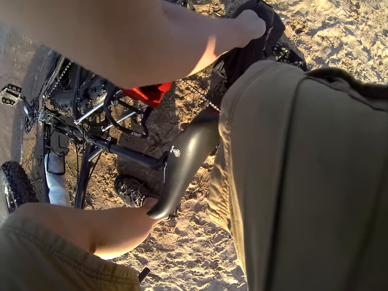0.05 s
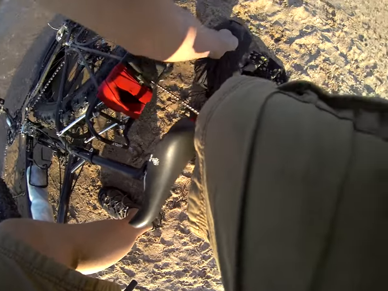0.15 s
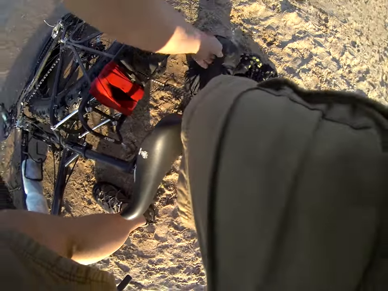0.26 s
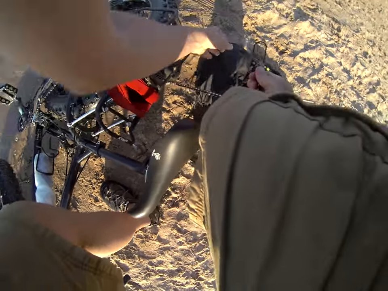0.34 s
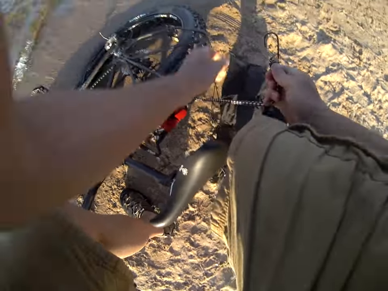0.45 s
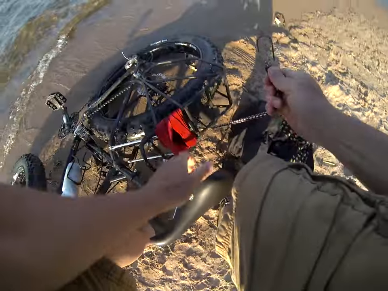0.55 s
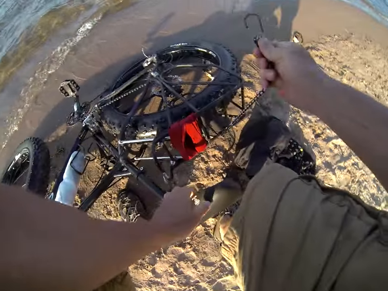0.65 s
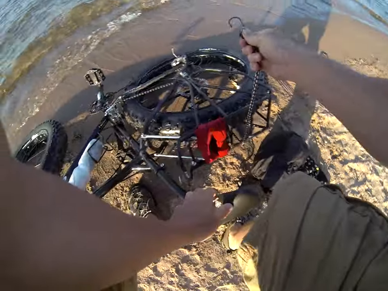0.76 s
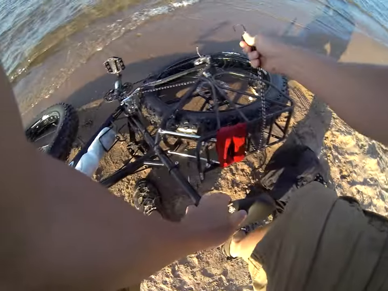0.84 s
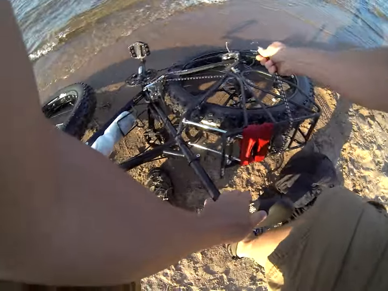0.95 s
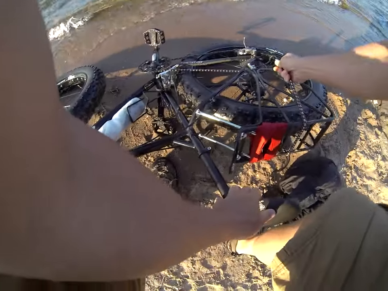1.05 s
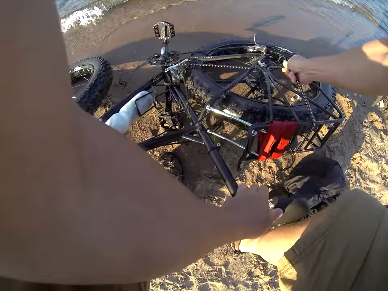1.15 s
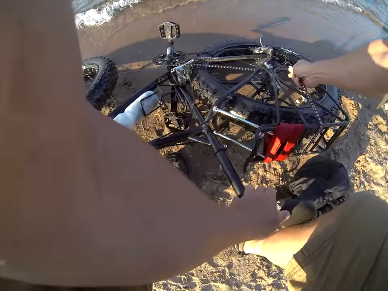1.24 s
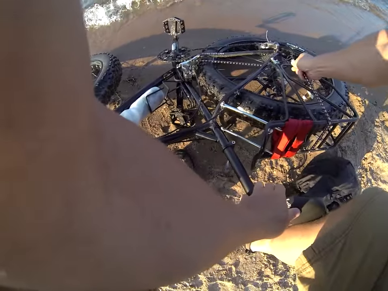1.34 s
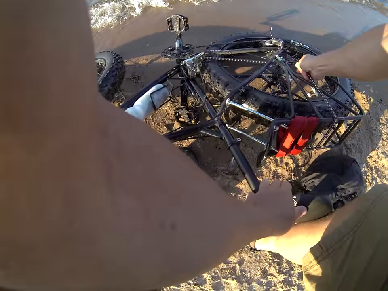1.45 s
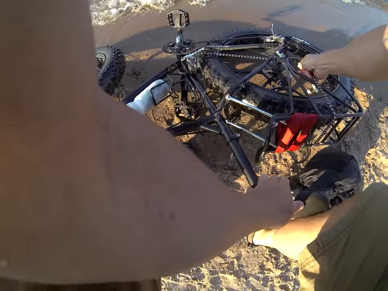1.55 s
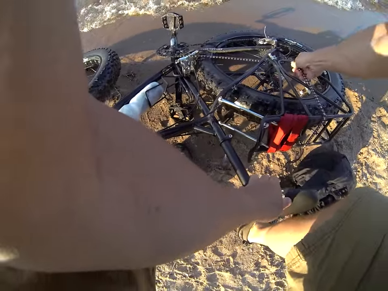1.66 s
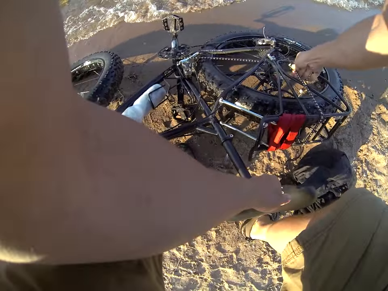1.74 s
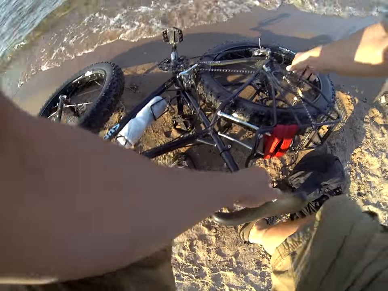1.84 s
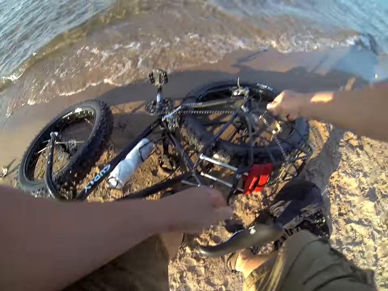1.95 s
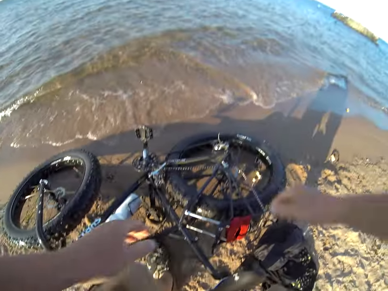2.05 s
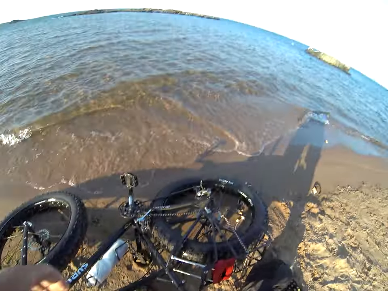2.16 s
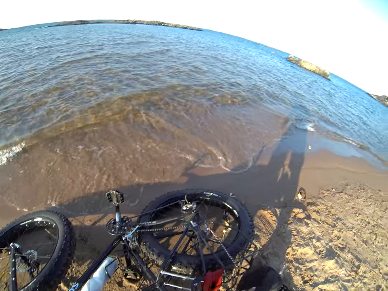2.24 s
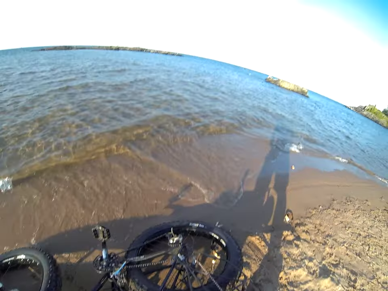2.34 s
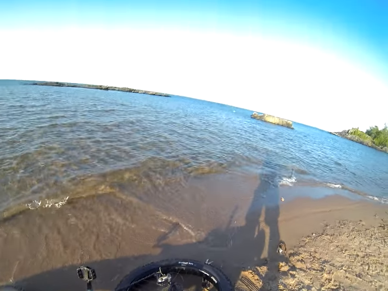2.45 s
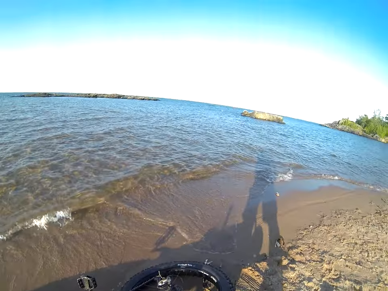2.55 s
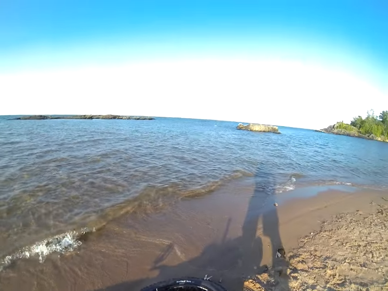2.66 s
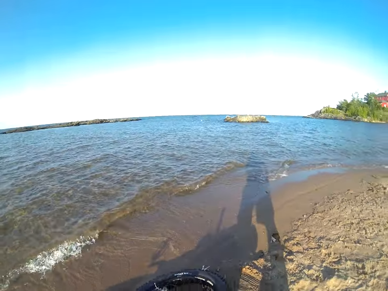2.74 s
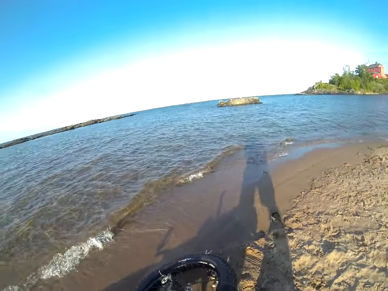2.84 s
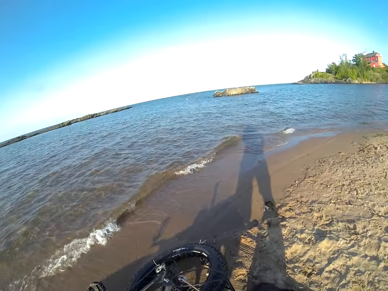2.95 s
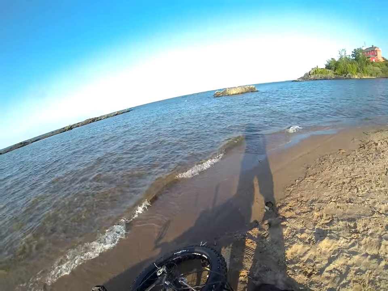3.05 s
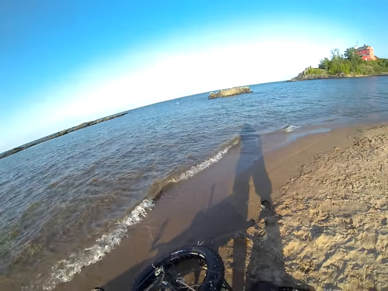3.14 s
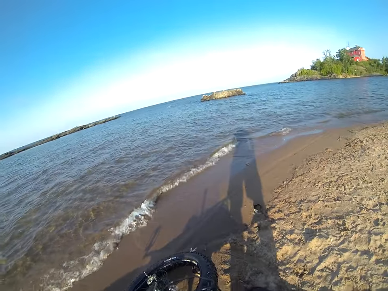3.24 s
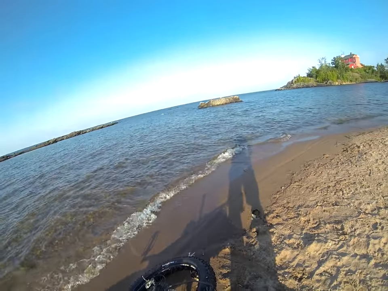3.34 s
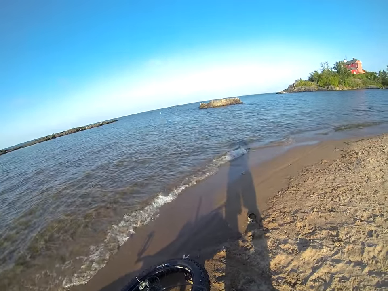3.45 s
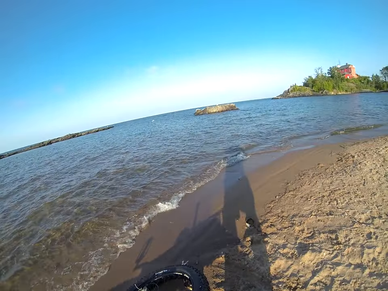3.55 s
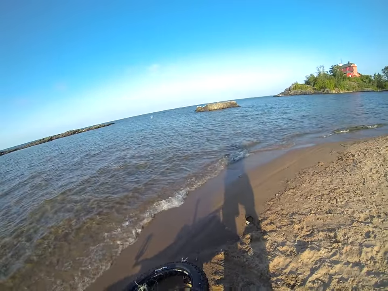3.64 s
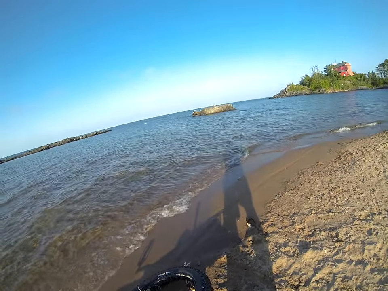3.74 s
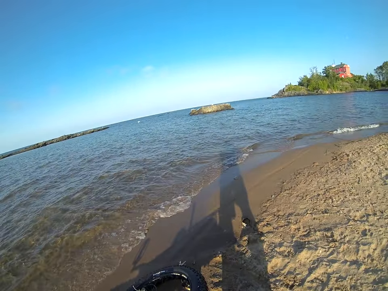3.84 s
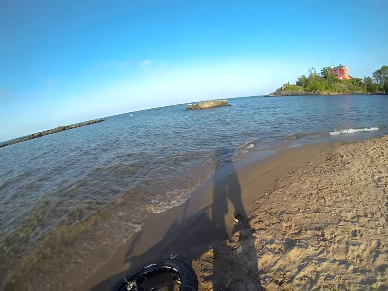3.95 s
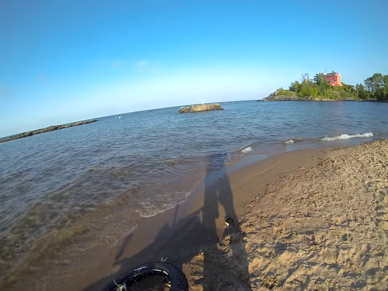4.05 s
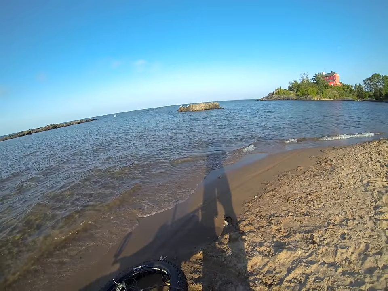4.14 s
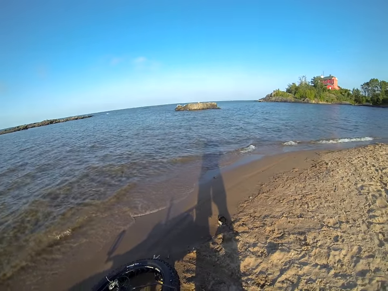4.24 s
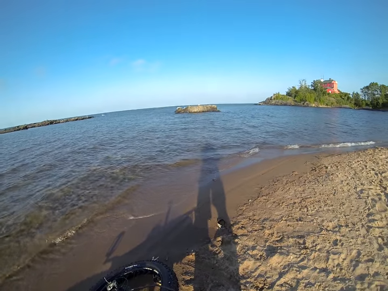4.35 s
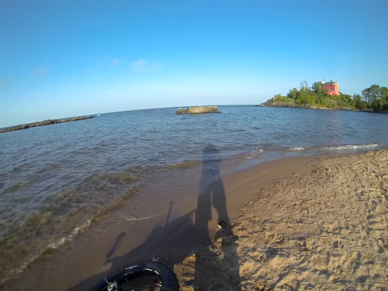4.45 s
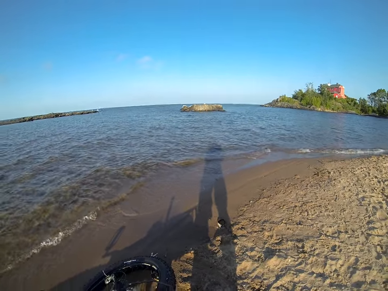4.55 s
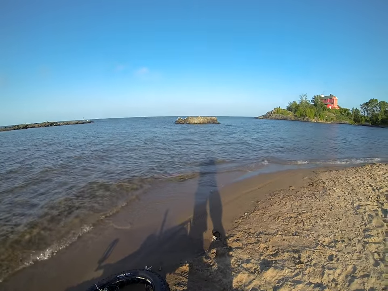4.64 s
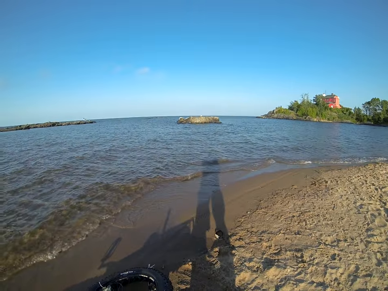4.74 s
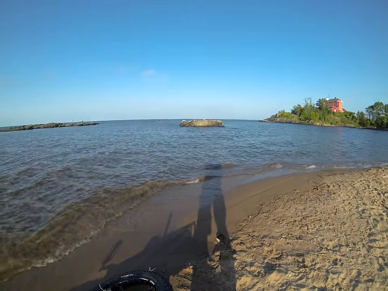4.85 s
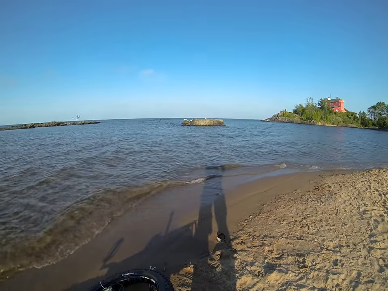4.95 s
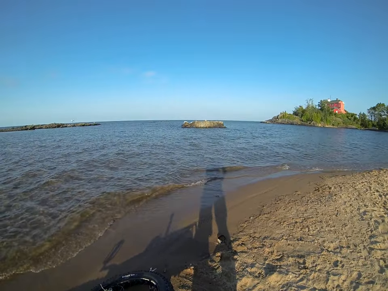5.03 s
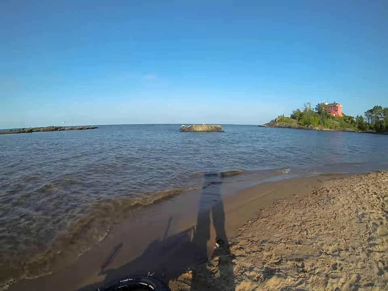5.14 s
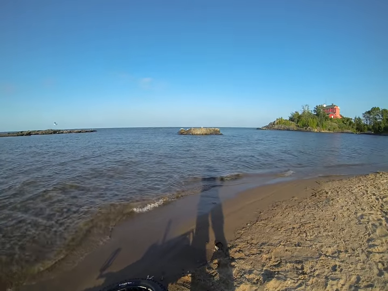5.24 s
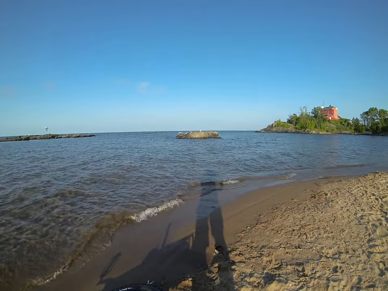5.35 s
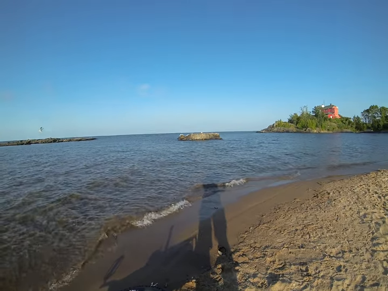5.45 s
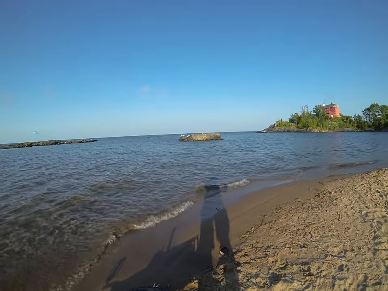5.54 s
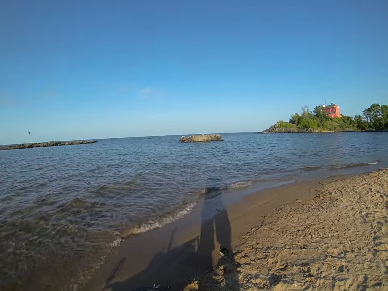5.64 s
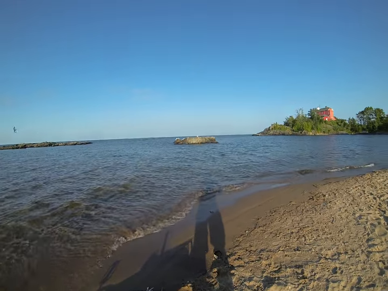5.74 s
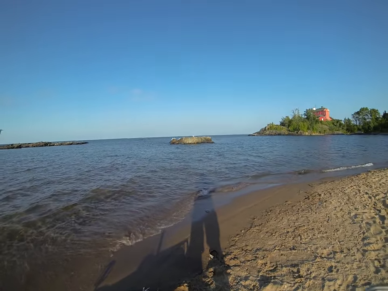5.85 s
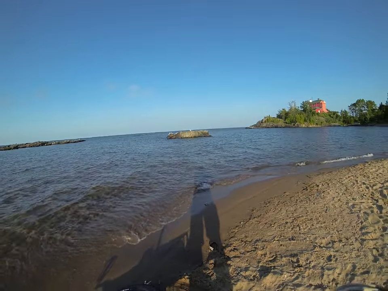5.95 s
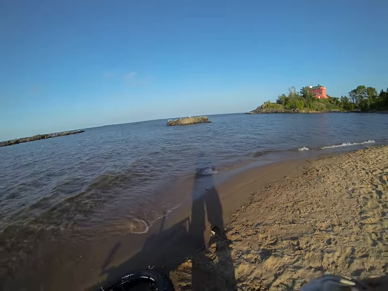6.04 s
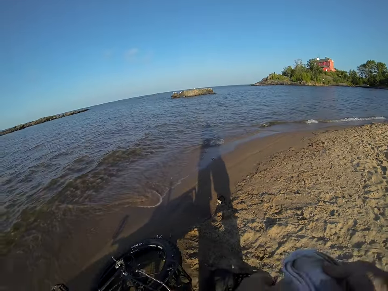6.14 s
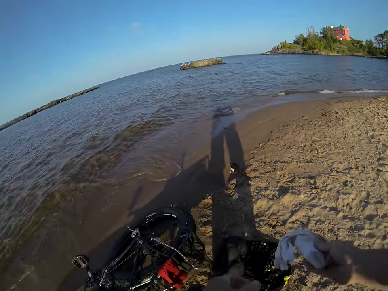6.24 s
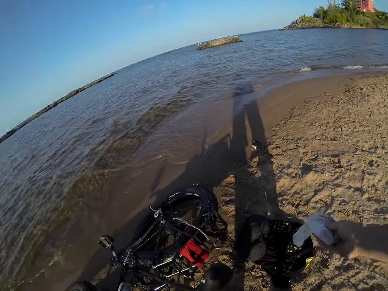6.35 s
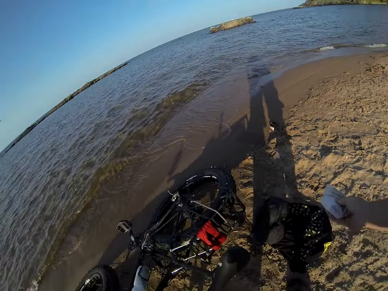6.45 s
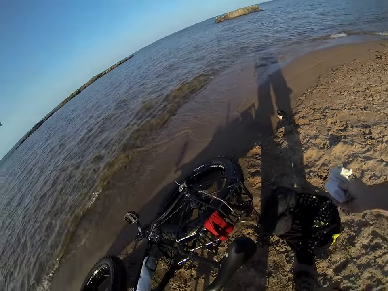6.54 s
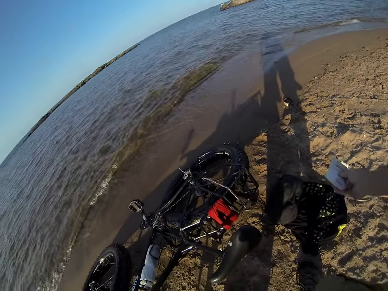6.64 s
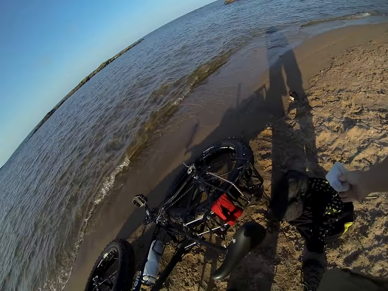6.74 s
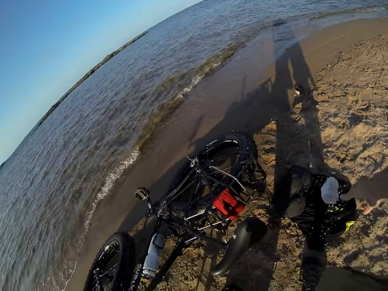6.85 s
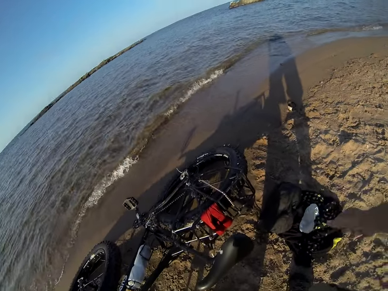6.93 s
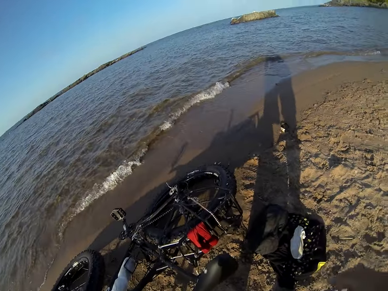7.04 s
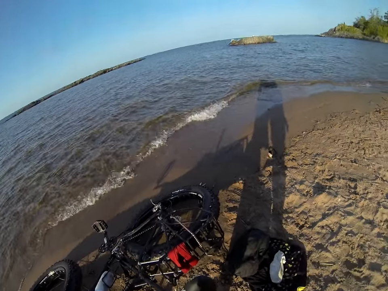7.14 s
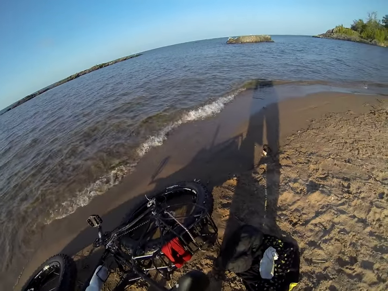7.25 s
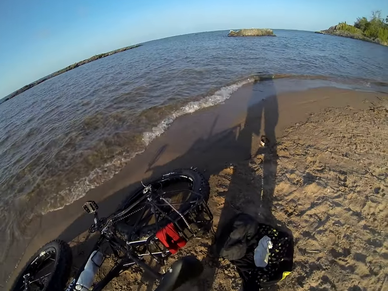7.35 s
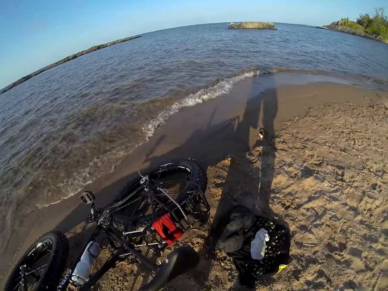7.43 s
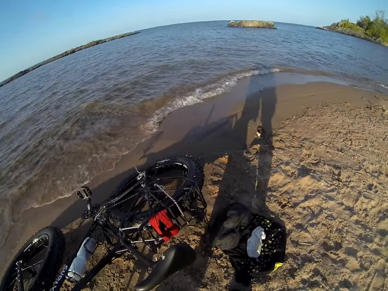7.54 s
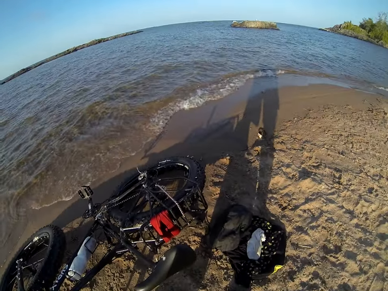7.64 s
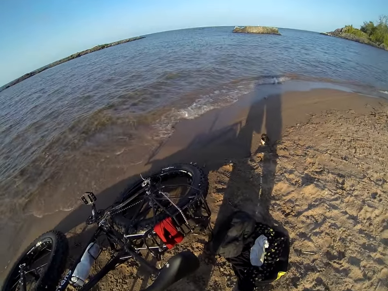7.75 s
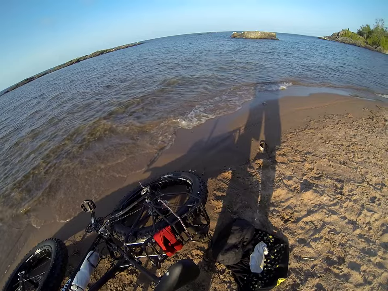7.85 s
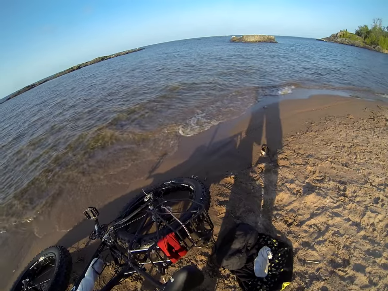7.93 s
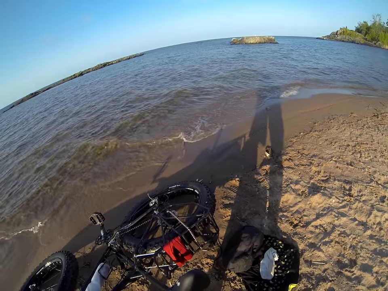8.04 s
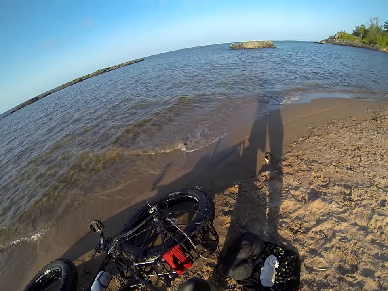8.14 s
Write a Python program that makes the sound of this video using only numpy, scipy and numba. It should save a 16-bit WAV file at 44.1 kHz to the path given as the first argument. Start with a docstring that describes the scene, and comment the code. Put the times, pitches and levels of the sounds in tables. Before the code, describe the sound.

Heard through a closed camera case worn on the body, gentle lake waves swell and drain on sand over a low rumble of wind and movement. Close fabric scrapes and thumps open the sound, followed by brief gear rustles and one light metallic tick. The strap keeps rubbing and knocking the case while the water gurgles and drips softly. More bumps and short scrapes come near the end.

```python
"""Small waves lap on a sandy lake shore, heard through the sealed case of a body-worn camera.
Each wave is a swell of noise and tiny bubbles, muffled by the case; trapped air gurgles and drops plink.
The strap knocks and rubs the case, cloth scrapes over it, and wind and body sway rumble in it.
Close by, gear on the sand rustles and a small metal part ticks."""
import sys
import numpy as np
from scipy import signal
from scipy.fft import rfft, irfft
from scipy.io import wavfile
from scipy.ndimage import uniform_filter1d
from numba import njit

SR = 44100
rng = np.random.default_rng(int(sys.argv[2]) if len(sys.argv) > 2 else 0)


def to_wav(sig):
    """Store sig (one row per channel, or 1-D mono) as 16-bit WAV at the path in sys.argv[1].

    Samples outside -1..1 are clipped; the rate is SR.
    """
    pcm = np.clip(np.atleast_2d(sig), -1, 1) * 32767
    pcm = np.round(pcm).astype(np.int16)
    wavfile.write(sys.argv[1], SR, pcm.T)  # frames by channels


N = 361179
T = np.arange(N) / SR


# Small waves breaking along the shore: crest_s, wash_db, spray_db, fizz_db
WAVES = [(0.1, -30, -31, -32), (0.95, -31.5, -31, -34), (1.22, -32, -35, -30.5), (1.52, -31, -32, -29.5),
         (2.15, -32.5, -31.5, -31.5), (2.5, -30.5, -41, -34), (2.68, -56, -30.5, -31),
         (3.02, -44, -29, -33), (3.3, -32, -29.5, -32.5), (3.8, -37, -60, -36), (4.05, -34.5, -33.5, -34),
         (4.6, -36, -37, -71), (5.37, -35, -31.5, -32.5), (5.68, -37, -35.5, -43),
         (6.05, -32.5, -36.5, -35), (6.8, -51, -32, -32.5), (6.97, -32, -31, -33), (7.1, -51, -29, -40),
         (7.34, -34.5, -37, -33), (7.65, -33, -61, -43), (8.05, -45, -36, -37)]

def wave_levels(build_db_per_s=45, drain_db_per_s=19):
    """Each wave builds fast and drains slowly, on top of the calm lapping."""
    calm_db = (-44.5, -49, -39)  # wash, spray, fizz
    power = gain(calm_db)[:, None] ** 2 * np.ones(N)
    for crest_s, *levels_db in WAVES:
        swell = 2 / (gain(2 * build_db_per_s * (crest_s - T)) + gain(2 * drain_db_per_s * (T - crest_s)))
        power = power + gain(levels_db)[:, None] ** 2 * swell
    return np.sqrt(power)


# How deep the wash sounds, as the lead of its lows over its highs: time_s, lead_db
WASH_DEPTH = [(0, 15), (.7, 5), (1.6, 2), (2.6, 7), (3.3, 1.5), (4.1, -1), (5.2, 0.5), (6.2, -1), (7.15, 0),
              (7.7, -4)]

def surf():
    """Far water is smooth noise, near foam a crowd of bubbles; they make low wash, spray and high fizz."""
    wash_level, spray_level, fizz_level = wave_levels()
    when, pitch, life, size = rng.random((20000, 4)).T
    size_db = np.minimum(-3.2 * np.log(1 - size), 14)  # many quiet bubbles, a few loud ones
    foam = bubbles((when * N).astype(np.int64), 1200 * 9 ** pitch, 3 + 6 * life, gain(size_db), 0.18)
    water = rng.standard_normal(N) + gain(-7) * unit_level(foam)
    wash = signal.sosfilt(signal.butter(4, 2050, fs=SR, output="sos"), water)
    lows = signal.sosfiltfilt(signal.butter(4, 1590, fs=SR, output="sos"), wash)
    depth = gain(curves(WASH_DEPTH)[0] / 2)
    wash = depth * lows + (wash - lows) / depth
    spray = signal.sosfilt(signal.butter(4, (2050, 6300), "band", fs=SR, output="sos"), water)
    fizz = signal.sosfilt(signal.butter(3, (5600, 12500), "band", fs=SR, output="sos"), water)
    pops_per_s, pop_s = 40, .007  # patches of foam burst and lift the fizz for a moment
    pops = (rng.random(N) < pops_per_s / SR) * rng.exponential(size=N)
    fizz *= 1 + gain(-9) * signal.fftconvolve(pops, np.hanning(int(pop_s * SR)), "same")
    flicker_db = .5 * wander(16)
    slosh = gain(1.5 + .48 * wander(16)) * band(rng.standard_normal(N), 820, 420)  # a splash's low body
    wash *= gain(.6 * wander(12))
    spray *= gain(flicker_db + .7 * wander(25))
    fizz *= gain(flicker_db)
    return wash_level * wash + spray_level * (spray + slosh) + fizz_level * fizz


@njit
def bubbles(start_sample, pitch_hz, cycles, size, rise):
    """Each bubble is a short tone that rises as it dies away; more cycles make it ring longer."""
    out = np.zeros(N + 4096)
    for k in range(len(start_sample)):
        phase, length = 0., min(int(cycles[k] * SR / pitch_hz[k] * 2), 4096)
        for i in range(length):
            phase += 2 * np.pi * pitch_hz[k] * (1 + rise * i / length) / SR
            out[start_sample[k] + i] += size[k] * np.exp(-5. * i / length) * np.sin(phase)
    return out[:N]


# How much sound gets through the case wall: pitch_hz, level_db
CASE_WALL = [(200, -16.5), (700, -23.5), (1150, -25.5), (1350, -18), (1900, -19.5), (2050, -28.5),
             (2200, -20), (2900, -18), (3800, -14), (4300, -27), (5800, -33.5), (8000, -40), (11000, -41),
             (12500, -41), (14500, -67)]
# Air pockets in front of the microphone: pitch_hz, width_hz, boost_db
AIR_POCKETS = [(1505, 94, 11.5), (1664, 112, 11.5), (3450, 120, 2.5), (5170, 310, 9), (7320, 400, 4),
               (9570, 470, 5.5)]

def through_case(sound):
    """The wall muffles outside sound, and the air pockets make a few pitches louder."""
    muffled = colour(sound, CASE_WALL)
    return muffled + sum((gain(db) - 1) * band(muffled, hz, width) for hz, width, db in AIR_POCKETS)


# Bursts of gurgling: start_s, length_s, level_db, pitch_hz
GURGLES = [(2.299, 0.2, -37, 1597), (2.55, 0.093, -38, 1490), (3.08, 0.25, -40, 1490),
           (3.76, 0.17, -43.5, 1530), (7.12, 0.06, -37, 1410), (7.681, 0.19, -45, 1760)]

def gurgles():
    """Air trapped under a wave makes a cluster of larger bubbles, close in pitch."""
    out = np.zeros(N)
    for start_s, length_s, level_db, pitch_hz in GURGLES:
        when, pitch, softness = rng.random((14, 3)).T
        starts = ((start_s + length_s * when) * SR).astype(np.int64)
        pitches_hz = pitch_hz * (1 + 0.074 * (pitch - .5))
        out += bubbles(starts, pitches_hz, np.full(14, 26.), gain(level_db - 8 * softness), rise=0.045)
    return band(out, 1530, 900)


# Single drops of water: start_s, level_db, pitch_hz
DROPS = [(1.409, -51, 3700), (4.9541, -53, 2960), (5.0075, -55, 3120), (5.0779, -54, 3700),
         (5.1682, -49, 3680), (5.327, -50, 3570), (5.4086, -49, 3740), (5.442, -52, 3570),
         (7.522, -51, 3200)]

def drops():
    """Drops fall back into the lake with a slightly rising plink; the case softens their start."""
    start_s, level_db, pitch_hz = np.transpose(DROPS)
    cycles = np.full(len(DROPS), 25.)
    plinks = bubbles((start_s * SR).astype(np.int64), pitch_hz, cycles, gain(level_db), rise=0.083)
    return gain(9) * band(plinks, 3370, 900)


# The tones of the case shaking on its mount: pitch_hz, level_db, fade_s
CASE_TONES = [(58, -1.5, 0.1), (102.7, 7.5, 0.088), (167, -16, 0.095), (205, -11.5, 0.072),
              (266.4, -7, 0.068), (392, -7.5, 0.018), (605, -7.5, 0.023), (769, -7, 0.018),
              (986, -1, 0.013)]
# Knocks on the case: peak_s, peak_db, contact_ms, fade_factor, scuff_db
KNOCKS = [(0.222, -24, 26, 2.2, 14), (0.282, -16.5, 4.2, 1.3, 17), (0.437, -33.5, 6.5, 8.4, -5),
          (0.509, -32.5, 7.3, 1, -11), (0.808, -33.5, 5.7, 3.2, -5), (0.933, -27.5, 6.9, 0.61, 11),
          (1.251, -31.5, 3.3, 1.15, 11), (1.8282, -25, 1.4, 0.18, -1), (1.8317, -13, 3.3, 0.71, 4),
          (2.336, -25.5, 4, 1.7, 8), (2.413, -23.5, 3.2, 0.91, -12), (2.522, -25, 3.7, 1.7, -17),
          (2.543, -23, 2.3, 0.16, -8), (2.661, -23.5, 4.5, 0.98, -12), (2.737, -23.5, 2.9, 0.38, -4),
          (2.746, -22.5, 2.6, 0.59, 0), (2.876, -26.5, 3.3, 0.6, -8), (2.99, -25, 4.7, 0.95, -5),
          (3.07, -17, 3.9, 0.35, -13), (3.232, -14.5, 4.6, 0.37, -12), (3.397, -26, 5.5, 0.66, -1),
          (3.42, -24.5, 5.7, 0.29, 4), (3.57, -32.5, 7.1, 0.32, -5), (3.842, -31, 9.4, 0.37, -14),
          (4.271, -32, 2.9, 0.47, -20), (4.612, -20.5, 4.3, 0.67, -8), (5.331, -30.5, 17.5, 2, 1),
          (5.842, -29, 23, 0.74, -20), (6.115, -23, 3.7, 0.58, -9), (6.277, -24.5, 4.3, 1, -18),
          (6.809, -22.5, 6.2, 1.14, -19), (7.075, -23, 8.1, 0.21, 10), (7.35, -22, 22, 0.37, -10),
          (7.394, -29, 17, 0.79, -8), (7.434, -24.5, 4.9, 1.2, 1), (7.457, -26, 3, 0.24, -5),
          (7.854, -33, 18.4, 3.7, -35)]

def knocks(scuff_ms=13.6):
    """A smooth push rings the low tones of the case; a rough scuff wakes the higher ones."""
    out = np.zeros(N)
    ms = T[:2048] * 1000
    scuffs = rng.standard_normal((len(KNOCKS), len(ms)))
    scuffs *= np.sin(np.pi * np.minimum(ms / scuff_ms, 1)) ** 2
    soft_mount = signal.butter(1, 70, "high", fs=SR)  # the mount gives way, so the case springs back
    dull = signal.butter(3, 780, fs=SR)
    for (peak_s, peak_db, contact_ms, fade_factor, scuff_db), scuff in zip(KNOCKS, scuffs):
        push = np.sin(np.pi * np.minimum(ms / contact_ms, 1)) ** 2
        case = ring(CASE_TONES, .3, max(fade_factor, .2))
        thud = signal.lfilter(*soft_mount, signal.fftconvolve(push, case))
        rasp = signal.fftconvolve(signal.lfilter(*dull, band(scuff, 650, 450)), case)
        add(out, peak_s - thud.argmax() / SR, thud + gain(scuff_db) * rasp, peak_db)
    return out


# Tones of the case panels under rubbing cloth: pitch_hz, width_hz, level_db
PANEL_TONES = [(400, 160, -4), (600, 70, 3), (720, 200, 2), (1450, 70, 7), (1720, 100, 11), (2220, 120, 4)]
# Extra panel tones that a crisp stroke brings out: pitch_hz, width_hz, level_db
CRISP_TONES = [(756, 45, 16.5), (826, 40, 8), (3280, 280, -3), (3700, 260, 0)]
# Strokes of cloth: start_s, length_s, level_db, ring_db (added to level), crisp_db (added to both), shake_db
SCRAPES = [(0, 0.19, -48.5, 13.5, -21, -39), (0.247, 0.0556, -21.5, -7.5, 3.5, -35.5),
           (0.323, 0.19, -36, -9.5, -9, -62), (0.444, 0.05, -38, -12, -8, -45.5),
           (0.768, 0.053, -30, -8.5, -16, -48), (0.924, 0.088, -33, -8.5, -10, -49),
           (2.356, 0.045, -47, -4, -8, -47), (2.64, 0.073, -38, -13, -8, -44.5),
           (2.864, 0.12, -49, 3, -8, -46), (5.382, 0.077, -61, -2, 12, -53),
           (6.253, 0.044, -37, -10, -6, -43.5), (6.351, 0.026, -45.5, 0.5, -3.5, -51),
           (7.073, 0.049, -48, 0, 3, -43), (7.318, 0.06, -71, 19, -11, -50.5),
           (7.385, 0.046, -45.5, 5, -14, -43.5)]

def cloth_scrapes(edge_s=.010):
    """Cloth fibres click over the wall, ringing its panels and shaking the case on its mount."""
    fibres = rng.standard_normal(N) * gain(1.2 * wander(149.4))
    stroke, press, crisp, shake = np.zeros((4, N))
    for start_s, length_s, level_db, ring_db, crisp_db, shake_db in SCRAPES:
        shape = np.clip(np.minimum(T - start_s, start_s + length_s - T) / edge_s + 1, 0, 1) ** 2
        stroke += gain(level_db) * shape
        press += gain(level_db + ring_db) * shape
        crisp += gain(level_db + ring_db + crisp_db) * shape
        shake += gain(shake_db) * shape
    out = through_case(fibres * stroke)
    for strength, tones in ((press, PANEL_TONES), (crisp, CRISP_TONES)):
        for hz, width, db in tones:
            out += gain(db) * band(band(fibres * strength, hz, 2 * width), hz, width)
    case = ring(CASE_TONES, .2, fade_factor=0.83)
    case = signal.lfilter(*signal.butter(2, (170, 700), "band", fs=SR), case)
    return out + vibrate(fibres * shake, case)


# The wearer moving: time_s, sway_db, rub_db
MOTION = [(0.0, -59, -33.5), (0.13, -34, -35.5), (0.5, -32, -44), (0.8, -34, -42), (1.15, -34.5, -51.5),
          (1.45, -33, -45), (1.7, -38.5, -43.5), (2.2, -38.5, -46.5), (2.6, -29.5, -44),
          (3.3, -28.5, -43.5), (3.7, -33.5, -47.5), (4.2, -36.5, -48), (4.6, -30.5, -45), (5.2, -38.5, -52),
          (5.8, -38.5, -52.5), (6.25, -35.5, -45), (6.7, -39, -50), (7.3, -31, -44), (7.6, -44.5, -45.5),
          (8.19, -37.5, -55.5)]

def strap_rub():
    """The strap sticks and slips, shaking the low tones of the case and, more weakly, the high ones."""
    _, rub_db = curves(MOTION)
    slips = rng.standard_normal(N) * gain(rub_db + 2.73 * wander(22))
    low = ring([tone for tone in CASE_TONES if tone[0] <= 450], .2, fade_factor=0.65)
    high = ring([tone for tone in CASE_TONES if tone[0] > 450], .2, fade_factor=0.65)
    return vibrate(slips, low) + gain(-17.5) * vibrate(slips, high)


# The deep tone of the rumble: pitch_hz, level_db
RUMBLE_COLOUR = [(3, -16.5), (8, 11.5), (16, 6.5), (30, -10), (50, -9.5), (80, -21.5), (200, -44),
                 (600, -67)]

def wind_and_sway():
    """Wind and body sway make slow swings of air pressure that flicker with the gusts."""
    sway_db, _ = curves(MOTION)
    return gain(sway_db + 0.79 * wander(12)) * unit_level(colour(rng.standard_normal(N), RUMBLE_COLOUR))


# Rustles close by: time_s, peak_db, pitch_hz, fade_s
RUSTLES = [(0.222, -32.5, 2630, 0.065), (1.596, -39.5, 3450, 0.055), (1.724, -34.5, 4330, 0.079),
           (1.978, -47, 5470, 0.079), (1.985, -43.5, 3380, 0.049), (2.058, -54, 7500, .03),
           (2.12, -56, 7000, 0.044), (2.696, -51, 8500, .04), (2.835, -59.5, 8000, .025),
           (3.197, -53, 5900, .025), (3.29, -53, 6950, 0.023), (5.277, -52, 5460, 0.023),
           (5.641, -50, 3960, 0.023), (6.56, -54, 5260, .03), (6.584, -45, 3500, 0.04),
           (6.792, -50, 4930, .04), (7.005, -57, 5500, .03), (8.044, -54, 4900, 0.038),
           (8.071, -54, 5730, 0.034)]

def gear_rustles():
    """Gear on the sand crackles in short bursts of noise."""
    out = np.zeros(N)
    t = T[:4096]
    for time_s, peak_db, hz, fade_s in RUSTLES:
        burst = rng.standard_normal(len(t)) * np.minimum(t / 0.007, 1) ** 2 * gain(-60 * t / fade_s)
        add(out, time_s - .003, band(band(burst, hz, hz / 2), hz, hz / 2), peak_db)
    return out


# The tones of a small metal part: pitch_hz, level_db, fade_s
METAL_TONES = [(4680, 0, 0.02), (5135, 2, .025), (5450, -2, 0.015), (7600, -8, 0.014), (7900, -5, 0.016),
               (9600, -14, .012), (10600, -14, .014), (11050, -10, 0.018)]
# When it ticks: time_s, peak_db
TICKS = [(1.442, -35)]

def metal_tick():
    """A brief rattling touch sets a small metal part ringing."""
    out = np.zeros(N)
    for time_s, peak_db in TICKS:
        rattle = rng.standard_normal(400) * np.hanning(400)
        add(out, time_s - .003, signal.fftconvolve(rattle, ring(METAL_TONES, .1)), peak_db)
    return out


def gain(db):
    """Turn decibels into a number to multiply by."""
    return 10 ** (np.asarray(db) / 20)


def unit_level(x):
    """Scale a sound to an average (rms) level of 1."""
    return x / np.sqrt(np.mean(x ** 2))


def curves(table):
    """Join each column's values with straight lines over time."""
    time_s, *columns = np.transpose(table)
    return [np.interp(T, time_s, column) for column in columns]


def colour(x, points):
    """Make each pitch louder or softer, following (pitch_hz, level_db) points."""
    size = 1 << 15
    hz, db = np.transpose(points)
    log_gain = np.interp(np.log(np.fft.rfftfreq(size, 1 / SR) + 1), np.log(hz), db) * np.log(10) / 20
    cepstrum = irfft(log_gain)  # folded below, so the filter rings only after a sound, never before
    cepstrum[1:size // 2] *= 2
    cepstrum[size // 2 + 1:] = 0
    return signal.fftconvolve(x, irfft(np.exp(rfft(cepstrum)))[:size // 2])[:len(x)]


def band(x, hz, width_hz):
    """Keep the part of a sound near one pitch."""
    return signal.lfilter(*signal.iirpeak(hz, hz / width_hz, fs=SR), x)


def ring(tones, length_s, fade_factor=1.):
    """An object tapped once: each tone drops 60 dB in fade_s times fade_factor."""
    t = T[:int(length_s * SR)]
    return sum(gain(db - 60 * t / (fade_s * fade_factor)) * np.sin(2 * np.pi * hz * t)
               for hz, db, fade_s in tones)


def vibrate(noise, ringing):
    """Shake a ringing object with noise, keeping about the same level."""
    return signal.fftconvolve(noise, ringing / np.sqrt(np.sum(ringing ** 2)))[:N]


def wander(steps_per_s):
    """A smooth random curve that typically strays about 1 from zero."""
    hold = int(SR / steps_per_s)
    steps = np.repeat(rng.standard_normal(N // hold + 1), hold)
    return 1.5 * uniform_filter1d(uniform_filter1d(steps, hold), hold)[:N]


def add(out, start_s, sound, peak_db):
    """Mix a sound in at the given time and peak level."""
    i = int(start_s * SR)
    sound = sound[:N - i]
    out[i:i + len(sound)] += sound * gain(peak_db) / np.abs(sound).max()


def scene():
    """The lake heard through the case, the gear nearby, and all that shakes or touches the case."""
    lake = through_case(surf()) + gurgles() + drops()
    gear = gear_rustles() + metal_tick()
    handling = wind_and_sway() + strap_rub() + knocks() + cloth_scrapes()
    return (lake + gear + handling)[None]


def record(dry):
    """The microphone adds a faint hiss, softens the highest treble and cuts it off above 14.2 kHz."""
    hiss = gain(-71.5) * band(rng.standard_normal(dry.shape), 2700, 6500)
    hiss += gain(-73.5) * band(rng.standard_normal(dry.shape), 10300, 3500)
    softened = signal.lfilter(*signal.butter(2, 11500, fs=SR), dry + hiss)
    return signal.sosfilt(signal.ellip(10, .2, 60, 14200, fs=SR, output="sos"), softened)


dry = scene()
out = record(dry)
to_wav(out)
```